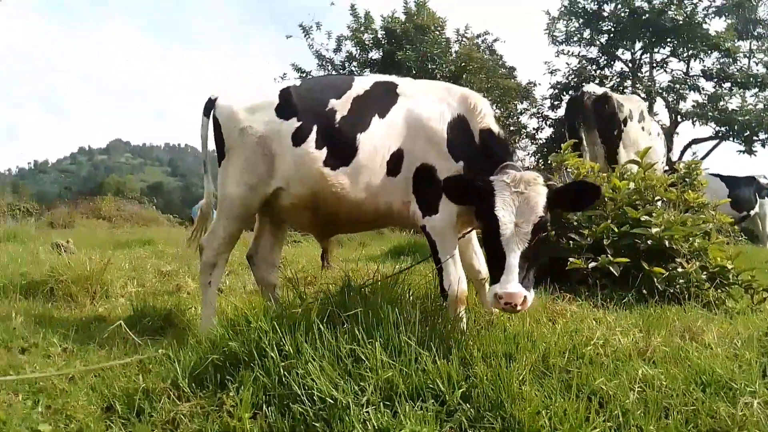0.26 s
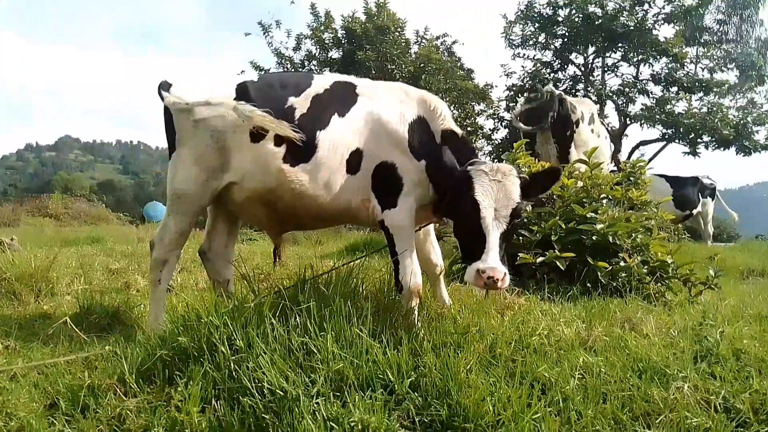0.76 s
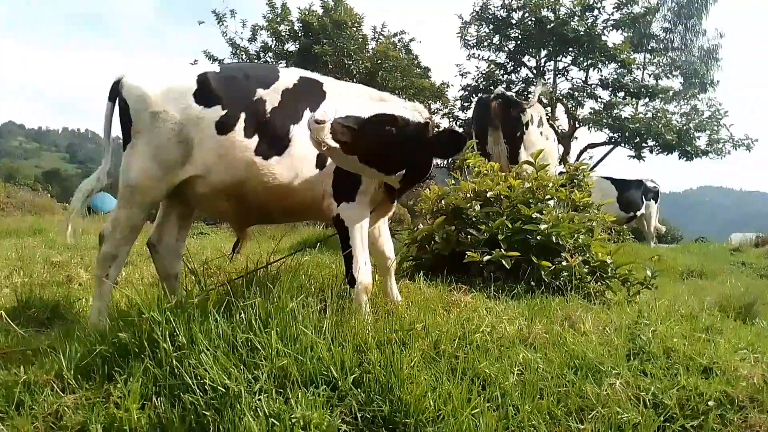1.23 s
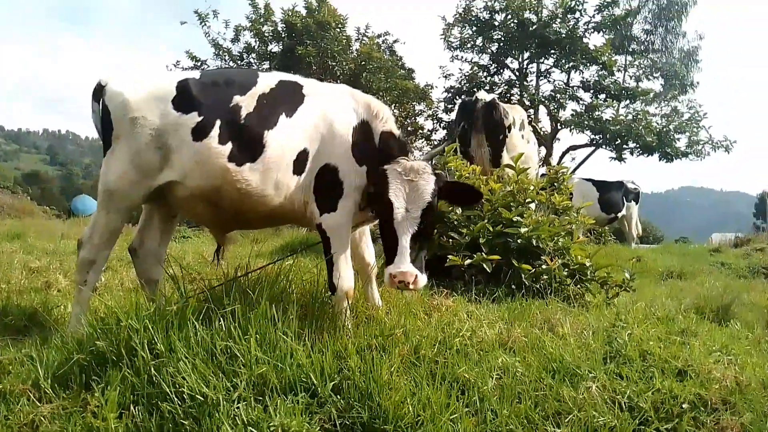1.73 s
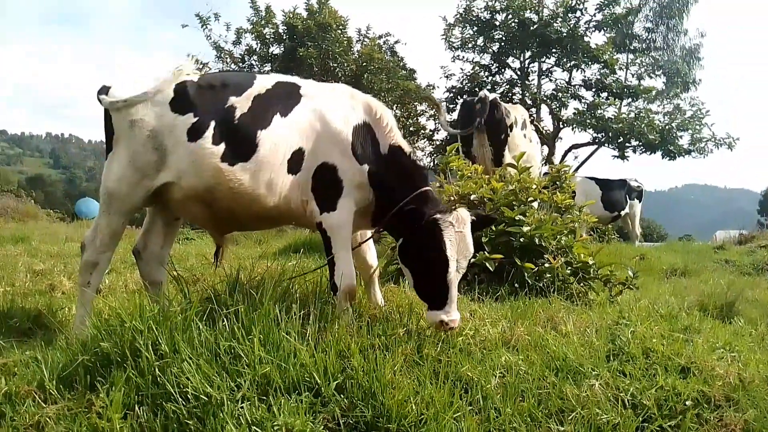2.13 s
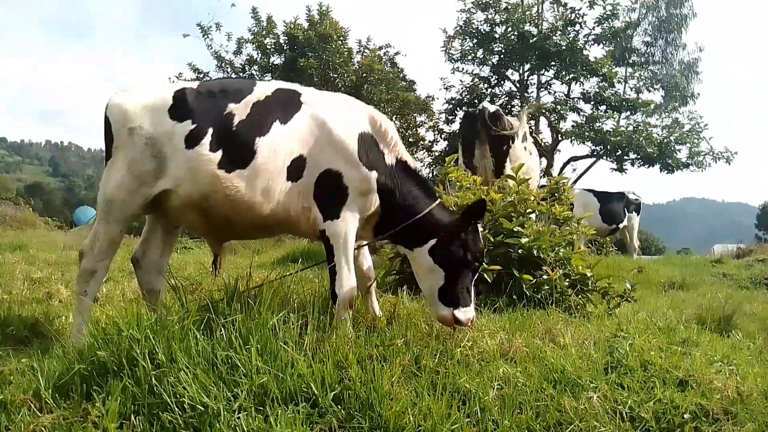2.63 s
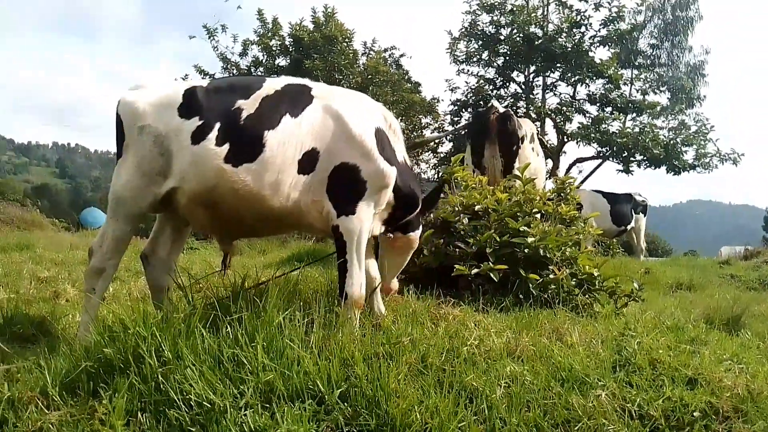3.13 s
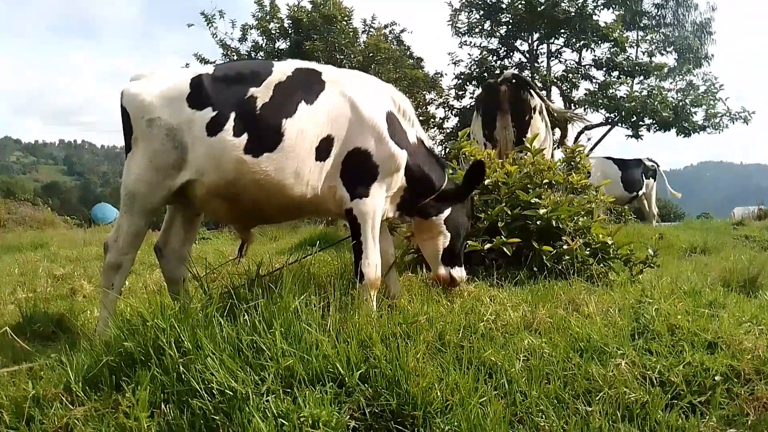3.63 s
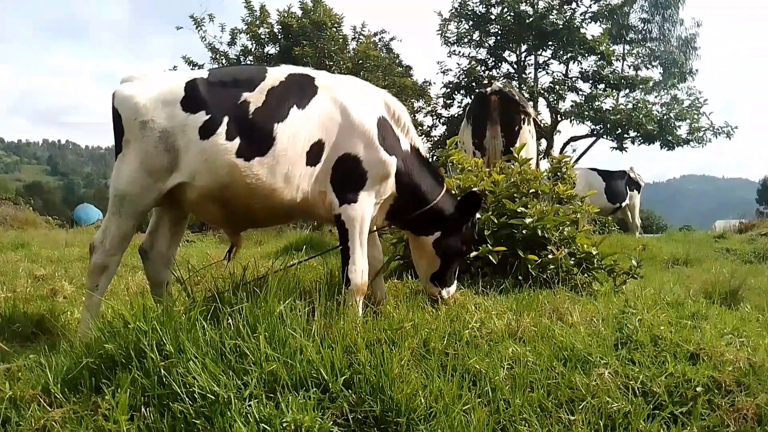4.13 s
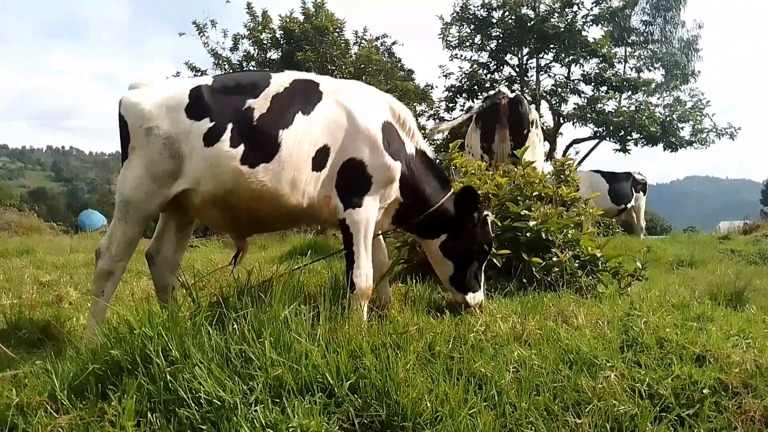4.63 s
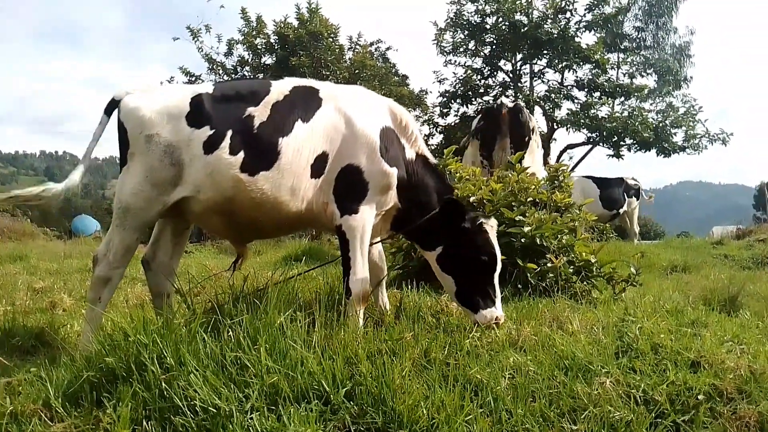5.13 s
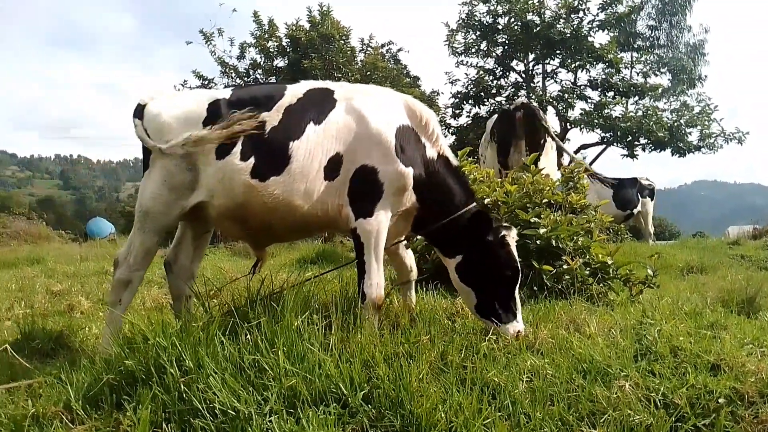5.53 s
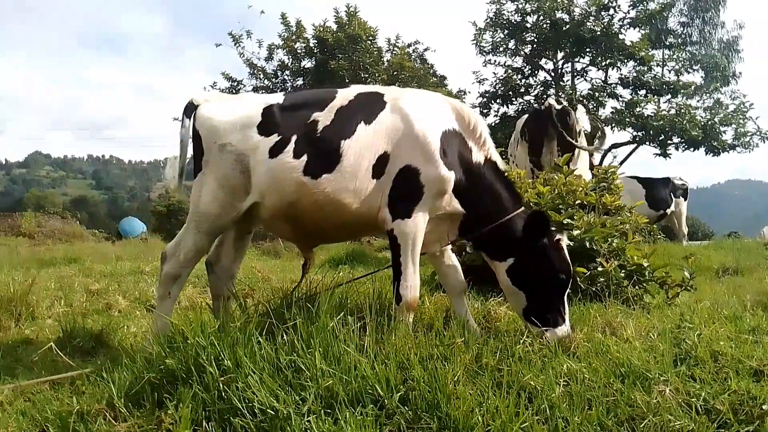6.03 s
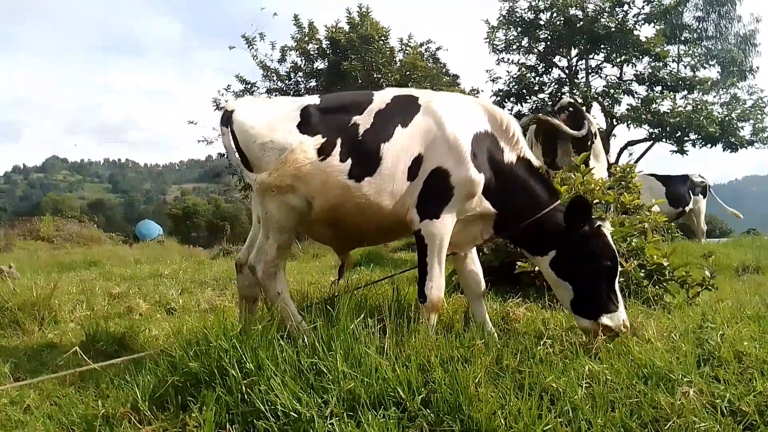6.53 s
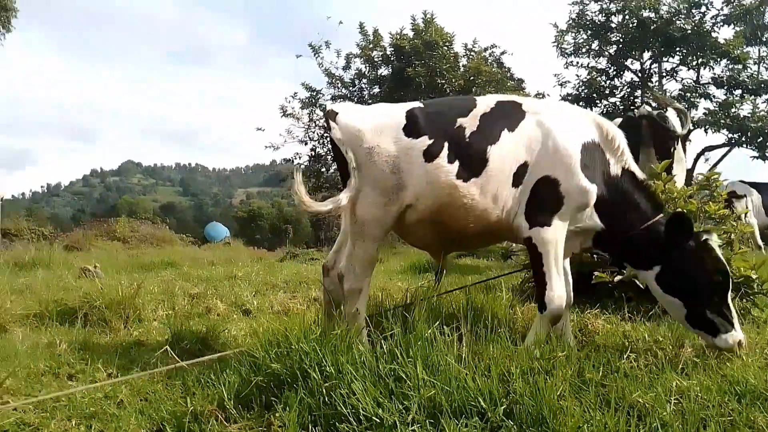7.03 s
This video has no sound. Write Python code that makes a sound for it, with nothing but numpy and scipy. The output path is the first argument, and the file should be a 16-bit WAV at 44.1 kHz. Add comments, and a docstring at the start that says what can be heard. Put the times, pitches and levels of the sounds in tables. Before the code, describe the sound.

Crisp grass rustling and stem snaps from a grazing cow, dull contact thuds, pulsing high cricket chirps, tiny bird notes and a faint breeze.

```python
"""Cow in long grass on a hillside pasture

A cow noses about close to the microphone: noise grains and fluttering bands rustle as blades, dying noise
bursts snap as stems, hooves and ears thud as short low rings, and jaw and tongue pop wetly. Crickets trill
near 6 kHz as falling tones, insects drone near 10 kHz as a noise band, small birds whistle gliding notes,
stalks tick, a breeze hisses. Hedge, slope and valley answer. One microphone feeds both channels."""
import sys
import numpy as np
from scipy import signal
from scipy.fft import rfft, irfft
from scipy.io import wavfile

SR = 44100
rng = np.random.default_rng(int(sys.argv[2]) if len(sys.argv) > 2 else 0)


def generate_wav(sig):
    """Save sig (samples, or channels by samples) to the path in sys.argv[1] as 16-bit PCM at SR."""
    pcm = np.round(np.clip(np.atleast_2d(sig).T, -1, 1) * 32767).astype(np.int16)
    wavfile.write(sys.argv[1], SR, pcm)


def to_linear_factor(level_db):
    """Convert decibel levels (scalar or array-like) to linear amplitude factors."""
    exponent = np.asarray(level_db, float) / 20
    return 10 ** exponent


N = 320166
TIME = np.arange(N) / SR


def in_time(rows):
    """Table columns joined by straight lines, one value a sample."""
    s, *columns = np.transpose(rows)
    return [np.interp(TIME, s, c) for c in columns]


def rms_one(x):
    """Scale to unit power."""
    return x / np.sqrt(np.mean(x ** 2) + 1e-20)


def colour(x, spectrum):
    """Minimum-phase filter through the (Hz, dB) points: nothing sounds early."""
    hz, db = np.transpose(spectrum)
    grid = np.maximum(np.arange(2049) * SR / 4096, 1)
    log_gain = np.log(to_linear_factor(np.interp(np.log(grid), np.log(hz), db)))
    cepstrum = irfft(log_gain)
    # folding the cepstrum onto positive time gives minimum phase
    cepstrum[1:2048] *= 2
    cepstrum[2049:] = 0
    response = irfft(np.exp(rfft(cepstrum)))
    return signal.fftconvolve(x, response)[:N]


def band(x, low_hz, high_hz):
    """Butterworth band-pass."""
    return signal.sosfilt(signal.butter(2, [low_hz, high_hz], "band", fs=SR, output="sos"), x)


def drift(rate):
    """Slow chance of about unit spread, with `rate` random knots per second."""
    knots = rng.standard_normal(2000)
    return np.interp(TIME * rate, np.arange(2000), knots) * 1.2


def add(out, s, burst):
    """Mix a short sound in at time s."""
    i = round(s * SR)
    out[i:i + len(burst)] += burst[:N - i]


def breeze():
    """Leaves and far wind: noise in which every band swells and sinks a little on its own."""
    # level of the breeze: (time [s], level [dB])
    breeze_level = [(0, -60), (.2, -56.5), (.5, -61), (1.15, -60.5), (1.5, -59.5), (2.1, -62.5),
                    (2.8, -62.5), (3.2, -60), (3.6, -62), (4.2, -60), (4.55, -62.5), (4.75, -60.5),
                    (5.3, -62), (5.52, -61), (5.8, -64.5), (6.3, -59.5), (6.7, -64), (7.0, -61),
                    (7.26, -66)]
    # spectrum of moving air and leaves: (frequency [Hz], relative level [dB per Hz])
    air_spectrum = [(25, 8), (60, -1.5), (200, -0.5), (400, -0.1), (900, -5.5), (2100, -9), (3300, -12.5),
                    (4900, -15.5), (7000, -1), (9000, -7), (12000, -22.5), (16000, -11.5)]
    edges = 20 * 2 ** np.arange(0, 10.1, .7)
    patches = sum(to_linear_factor(2.64 * drift(7.0)) * band(rng.standard_normal(N), low, high)
                  for low, high in zip(edges, edges[1:]))
    return to_linear_factor(*in_time(breeze_level)) * rms_one(colour(patches, air_spectrum))


def drone(db, hz, share):
    """A chorus of tiny wings: noise in a wandering band, part of it throbbing."""
    width_hz, throbs_per_s = 960, 97
    lowpass = signal.butter(2, width_hz / 2, fs=SR, output="sos")
    low = signal.sosfilt(lowpass, rng.standard_normal((2, N)))
    # two slow noises on a carrier make one band around the wandering centre
    turn = 2 * np.pi * np.cumsum(hz) / SR
    hiss = rms_one(low[0] * np.cos(turn) + low[1] * np.sin(turn))
    throb = np.cos(2 * np.pi * np.cumsum(throbs_per_s + 1.31 * drift(1.75)) / SR)
    return to_linear_factor(db) * hiss * (1 + np.clip(share, 0, 1) * throb)


def rustle(db, dark):
    """Blades rub: dense uneven grains, clumped in time; damp low blades sound darker."""
    # spectrum of rubbing blades: (frequency [Hz], relative level [dB per Hz])
    blade_spectrum = [(300, -13.5), (1500, -12), (3400, -12), (5000, -6.5), (6500, -4), (8500, 3.5),
                      (11000, -4), (15000, -5), (16000, -2.5)]
    grains_per_s = 5000 * to_linear_factor(3 * drift(40.0))
    born = rng.random(N) < grains_per_s / SR
    size = to_linear_factor(3.4 * np.minimum(rng.exponential(1, N), 5))
    grains = born * size * rng.choice([-1, 1], N)
    bright = rms_one(colour(rms_one(grains) + 0.61 * rng.standard_normal(N), blade_spectrum))
    # darkness adds weight at 5.4-10 kHz, below the brightest hiss
    darker = 2.15 * np.clip(dark, 0, 1) * band(bright, 5440, 10100)
    return to_linear_factor(db + 1.26 * drift(30.0)) * (bright + darker)


def high_rustle(db):
    """Thin rustle hiss of the grass: noise in a narrow band near 10.9 kHz."""
    return to_linear_factor(db) * rms_one(band(band(rng.standard_normal(N), 10750, 11050), 10750, 11050))


def whistle(length, from_hz, to_hz, flutter):
    """A note that glides fast at first, then levels out; its loudness flutters."""
    part = np.arange(0, 1, 1 / (length * SR))
    pitch = to_hz + (from_hz - to_hz) * (1 - part) ** 3
    loudness = np.sin(np.pi * part) ** .5 * flutter[:len(part)]
    return loudness * np.sin(2 * np.pi * np.cumsum(pitch) / SR)


def mid_rustle():
    """Grass noise at 2.7-3.9 kHz, with short whistling squeaks that flutter and come at random."""
    # level of the middle band of the rustle: (time [s], level [dB])
    mid_level = [(0, -58.5), (.2, -58.5), (.3, -67), (.9, -69.5), (1.3, -65.5), (1.9, -79), (2.3, -71),
                 (2.7, -74), (3.05, -67), (3.4, -76.5), (4.2, -68), (5.3, -74), (5.8, -64.5), (6.15, -71),
                 (6.4, -66.5), (6.8, -63.5), (7.26, -70)]
    flutter = to_linear_factor(3 * drift(250.0))
    mid = rms_one(band(rng.standard_normal(N), 2730, 3880))
    for when, long, low, glide in rng.random((90, 4)):
        hz = 2600 + 1000 * low
        squeak = whistle(.015 + .04 * long, hz * (.88 + .24 * glide), hz, flutter)
        add(mid, 7.2 * when, .7 * squeak)
    return to_linear_factor(*in_time(mid_level)) * rms_one(mid)


def snaps(rustle_db):
    """A stem breaks: a noise burst as crack, a short ring, a duller body; small ones follow the rustle."""
    # stems that snap: (time [s], nominal level [dB], body against crack before colouring [dB])
    stem_snaps = [(0.0646, -37.5, -1), (0.1625, -25.5, -16), (0.2594, -43, 8.5), (.288, -35, -13),
                  (.4213, -44, -11), (1.0027, -41, 2), (1.064, -37, -6.5), (1.586, -49.5, 12.5),
                  (2.965, -43, -3), (2.369, -37, -14), (3.463, -32, -20), (4.1449, -37, -13),
                  (4.352, -40.5, -6), (4.4791, -44.5, 2.5), (4.5823, -40, -12), (4.6392, -30, -18),
                  (4.667, -27, -8.5), (4.6894, -29.5, -18), (4.6933, -32, -23), (4.7757, -38, -19),
                  (5.4992, -39, -10), (5.8142, -32, -26), (5.8328, -21.5, -12.5), (5.849, -32.5, -10),
                  (5.8757, -31.5, -19), (6.0857, -28, -15), (6.3666, -27, -6.5), (6.371, -38, -11),
                  (6.3785, -27, -19), (6.3886, -28, -15), (6.4, -32, -12), (6.4064, -27.5, -14),
                  (6.4226, -29.5, -10), (6.4511, -29, -2.5), (6.8253, -34.5, -21), (6.839, -42.5, -21),
                  (7.0302, -30, -19), (7.0361, -34, -10), (7.0402, -23, -15), (7.0418, -19, -17),
                  (7.069, -27.5, -14), (7.0724, -31, -8.5), (7.0736, -33, -14), (7.0769, -34, -6)]
    # spectrum of the crack: (frequency [Hz], gain before a common lift [dB])
    crack_spectrum = [(300, -22), (2100, -42), (5000, -26), (6700, -6.5), (8400, -0.5), (10000, -10.5),
                      (12300, -17), (15000, -20), (16000, -10)]
    # spectrum of the stem's body: (frequency [Hz], gain [dB])
    stem_spectrum = [(300, -46), (800, -5), (2100, -3), (3400, 8), (4500, -1.5), (6000, -42)]
    small_per_s, small_db, busy_db = 20, -46.5, -56.5     # this many a second at the busy rustle level
    usual_t60_s, ring_hz, ring_spread_hz = 0.02, 8620, 970
    crack, body, ring = np.zeros((3, N))
    t = np.arange(1300) / SR
    when, keep, size, dull = rng.random((400, 4)).T
    when = when * N / SR
    wanted = small_per_s * to_linear_factor(np.interp(when, TIME, rustle_db) - busy_db) * N / SR
    kept = keep < wanted / len(when)
    small = np.transpose([when, small_db - 10.2 * size, 20.0 * dull - 17.0])[kept]
    noises = rng.standard_normal((len(stem_snaps) + len(when), 2, len(t) + 1))
    for (s, db, body_db), noise in zip([*stem_snaps, *small], noises):
        # the last value of each noise row is spare: it varies decay and ring
        t60 = usual_t60_s * to_linear_factor(0.5 * noise[0, -1])
        hz = ring_hz + ring_spread_hz * noise[1, -1]
        onset = (1 - np.exp(-t / 0.00017)) * (0.54 + 1.18 * np.exp(-t / 0.00033))
        fall = to_linear_factor(db - 60 * t / t60) * onset
        burst = fall * noise[:, :-1]
        # every burst carries the energy of its envelope
        burst = burst * np.linalg.norm(fall) / np.linalg.norm(burst, axis=1, keepdims=True)
        add(crack, s, burst[0])
        add(body, s, to_linear_factor(body_db) * burst[1])
        add(ring, s, 0.13 * fall * np.sin(2 * np.pi * hz * t))
    return ring + to_linear_factor(8.5) * colour(crack, crack_spectrum) + colour(body, stem_spectrum)


def thuds():
    """Soft contacts of hooves and ears: a ring of a few cycles, a grainy puff and a hard first touch."""
    # soft thuds and knocks: (time [s], nominal level [dB], pitch [Hz], time to fade 60 dB [cycles])
    soft_contacts = [(.066, -44.5, 345, 10), (.136, -43.5, 1000, 24), (.162, -44, 440, 14),
                     (.335, -48.5, 431, 18), (.649, -49.5, 1270, 27), (.753, -42.5, 1270, 37),
                     (1.002, -38, 239, 5), (1.565, -39.5, 237, 4.5), (1.584, -43, 220, 11),
                     (1.613, -26, 348, 3.5), (1.615, -42, 140, 6.5), (1.681, -29.5, 330, 3.5),
                     (1.684, -44, 140, 6), (2.315, -43, 315, 9), (3.09, -47.5, 406, 8),
                     (3.169, -45.5, 300, 12), (3.184, -40.5, 600, 8), (3.759, -48, 368, 6.5),
                     (3.812, -46, 1740, 50.5), (4.014, -44.5, 262, 6.5), (4.103, -45, 930, 9),
                     (4.144, -45, 860, 12), (4.465, -46, 1670, 29), (4.479, -45, 1500, 20),
                     (4.677, -44, 322, 6), (4.713, -42, 530, 4), (4.73, -48, 298, 21), (4.742, -47, 377, 9),
                     (5.055, -50, 1880, 59), (5.079, -50, 1200, 25), (5.474, -54, 299, 14),
                     (5.493, -45.5, 457, 11), (5.51, -50, 300, 15.5), (6.45, -39, 251, 7.5),
                     (7.041, -38, 600, 15), (7.074, -34, 646, 12), (7.076, -36.5, 1050, 16),
                     (7.085, -47, 150, 6.5)]
    grain, faint_db, faint_cycles = 0.42, -52.5, 11     # grain: share of puff, 0-1
    out, t = np.zeros(N), np.arange(4000) / SR
    faint = [(when * N / SR, faint_db - 4.4 * size, 250 + 250 * pitch, faint_cycles)
             for when, size, pitch in rng.random((14, 3))]
    grainy = np.clip(grain, .02, 1)
    for s, db, hz, cycles in soft_contacts + faint:
        noise = rng.standard_normal(len(t))
        puff = rms_one(band(noise ** 3, hz * .5, hz * 2.68))     # cubed noise crunches in grains
        touch = rms_one(band(noise, hz * 2.0, hz * 9.1)) * np.exp(-t * hz * 1.4)
        swell = 1 - np.exp(-t * hz / (0.74 * grainy))
        tone = (1 - grainy) * np.sin(2 * np.pi * hz * t)
        contact = 0.15 * (1 - grainy) * touch + swell * (tone + grainy * puff)
        add(out, s, to_linear_factor(db - 60 * t * hz / cycles) * contact)
    return out


def chewing():
    """Small wet pops of jaw and tongue, in clumps, each ringing a few cycles."""
    out, t = np.zeros(N), np.arange(1500) / SR
    clumps = 7 * rng.random(60)     # clump starts in s
    for clump, when, pitch, size in rng.random((300, 4)):
        hz = 250 * 14.0 ** pitch
        fall = to_linear_factor(-9.0 * size - 12.5 * t * hz) * (1 - np.exp(-t * hz))
        s = clumps[int(clump * len(clumps))] + .12 * when
        add(out, s, fall * np.sin(2 * np.pi * hz * t))
    return to_linear_factor(-51.5) * out


def bird_notes():
    """Separate bird notes and faint far tones: each one a gliding, fluttering whistle."""
    # a near bird's upward chirps: (time [s], length [s], start pitch [Hz], level before flutter [dB])
    chirp_rows = [(0.243, 0.025, 4320, -44.5), (0.261, .009, 4240, -40), (0.286, 0.0039, 5950, -44),
                  (.295, 0.012, 5750, -43), (.309, .0074, 5060, -43.5), (0.319, .0065, 4960, -51),
                  (1.866, 0.011, 5500, -38.5), (4.673, 0.019, 5010, -40), (4.686, 0.017, 5050, -39)]
    # another bird's repeated falling note: (time [s], length [s], level before flutter [dB])
    tseep_rows = [(6.04, .04, -58), (6.295, 0.061, -57), (6.57, .07, -58.5), (6.866, .051, -56.5),
                  (7.148, .046, -58)]
    # other bird notes: (time [s], length [s], start pitch [Hz], end pitch [Hz], level before flutter [dB])
    other_notes = [(.235, 0.015, 5200, 7000, -45), (0.267, 0.02, 6180, 6120, -44),
                   (1.874, 0.039, 6740, 6840, -48), (1.885, 0.043, 7170, 7130, -48),
                   (1.92, .045, 6950, 6900, -48.5), (1.962, .03, 6900, 6980, -53),
                   (2.109, 0.037, 2690, 2800, -66), (2.234, 0.047, 3490, 2980, -62),
                   (2.469, 0.028, 3000, 2720, -63), (2.882, .022, 3300, 3400, -63),
                   (2.904, .02, 3200, 2960, -64), (3.002, .02, 2510, 2490, -67),
                   (2.703, .012, 6800, 6300, -59), (2.836, 0.013, 7050, 6400, -61),
                   (3.384, 0.012, 6740, 6300, -53.5), (4.614, 0.057, 3450, 3200, -58),
                   (3.992, 0.032, 3500, 3250, -63), (5.64, .1, 3100, 2660, -66.5),
                   (4.659, 0.0091, 6500, 6900, -41), (4.732, 0.0083, 6300, 6570, -43),
                   (5.118, 0.022, 3020, 3480, -55.5), (5.14, .025, 3400, 3010, -61.5),
                   (5.073, .014, 3200, 3270, -60.5), (5.661, .0096, 8300, 8130, -38),
                   (5.671, .013, 8150, 7750, -41), (5.677, 0.029, 7500, 7350, -45),
                   (5.679, .013, 6150, 6170, -40), (5.68, 0.028, 3360, 3240, -57),
                   (5.9, .02, 5690, 5630, -48), (6.226, 0.032, 3600, 3270, -58.5),
                   (7.107, 0.054, 3280, 3230, -59.5)]
    # faint low tones from far away:
    # (time [s], length [s], start pitch [Hz], end pitch [Hz], level before flutter [dB])
    far_tones = [(4.175, .11, 766, 752, -68), (5.76, .25, 1080, 907, -76), (7.114, .14, 1082, 1060, -72.5)]
    chirp_top_hz, tseep_from_hz, tseep_to_hz = 6400, 5700, 5300
    out, flutter = np.zeros(N), to_linear_factor(3 * drift(250.0))
    chirps = [(s, length, hz, chirp_top_hz, db) for s, length, hz, db in chirp_rows]
    tseeps = [(s, length, tseep_from_hz, tseep_to_hz, db) for s, length, db in tseep_rows]
    for s, length, from_hz, to_hz, db in chirps + tseeps + other_notes + far_tones:
        add(out, s, to_linear_factor(db) * whistle(length, from_hz, to_hz, flutter[round(s * SR):]))
    return out


def ticks():
    """A dry stalk gives one click, a band-passed impulse too short to ring."""
    # dry single ticks: (time [s], peak level [dB], low edge [Hz], high edge [Hz])
    stalk_ticks = [(0.422, -33, 1200, 5200), (3.4655, -31.5, 3060, 9000)]
    out = np.zeros(N)
    for s, db, low_hz, high_hz in stalk_ticks:
        click = band(signal.unit_impulse(200), low_hz, high_hz)
        add(out, s, to_linear_factor(db) * click / np.abs(click).max())
    return out


def crickets():
    """Every wing stroke is a short tone falling in pitch; pace drifts and strokes turn long-short in a trill."""
    # trills: (voice, first stroke [s], last stroke [s], pace in the middle [strokes per s])
    trills = [("wide", .4311, .5001, 144.1), ("wide", .7062, .8286, 147), ("wide", 1.0245, 1.1707, 143.5),
              ("wide", 1.3734, 1.5293, 140.4), ("wide", 1.7582, 1.9316, 138.4),
              ("wide", 1.9905, 2.1204, 123.2), ("faint", 2.6898, 2.8281, 115.8),
              ("narrow", 2.8454, 2.9316, 139.5), ("narrow", 3.1651, 3.2924, 141.7),
              ("faint", 3.3012, 3.3691, 117.6), ("narrow", 3.4992, 3.6263, 142),
              ("narrow", 3.8228, 3.9522, 140), ("faint", 3.9737, 4.0668, 108),
              ("narrow", 4.1669, 4.3065, 136.5), ("faint", 4.3285, 4.4643, 121),
              ("narrow", 4.5214, 4.654, 135.6), ("narrow", 4.8918, 5.0185, 134.1),
              ("high", 5.0313, 5.0863, 144.1), ("high", 5.3006, 5.4348, 149),
              ("high", 5.6536, 5.7902, 146.1), ("high", 6.0067, 6.1445, 145)]
    # level of each trill before stroke spread, same order: (start [dB], end [dB])
    trill_levels = [(-53, -44.5), (-52, -43.5), (-50, -42), (-47.5, -40), (-50, -39), (-62, -55),
                    (-67, -56.5), (-55, -44), (-52, -42), (-67.5, -55), (-52, -40.5), (-51.5, -42),
                    (-51, -60), (-50, -39), (-51, -59), (-49, -40), (-50.5, -39), (-44.5, -48.5),
                    (-54.5, -47.5), (-53, -47), (-53, -48.5)]
    # by voice: (held pitch [Hz], first strokes off that [Hz], half the fall within a stroke [Hz],
    #            slowing through a trill [share, negative quickens], early share of the swell [ratio])
    voices = {"wide": (5920, 140, 1180, 0.08, 1), "narrow": (6039.5, -200, 490, 0.2, 0.72),
              "high": (6351, -96.5, 478, -0.1, 1.13), "faint": (5600, 99, 660, 0.21, 0.61)}
    narrowness, spread_db, long_short = 5.8, 1.7, 0.25
    out = np.zeros(N)
    for (voice, first, last, pace), (start_db, end_db) in zip(trills, trill_levels):
        held_hz, off_hz, sweep_hz, slowing, early = voices[voice]
        rate, end_rate = pace * (1 + slowing / 2), pace * (1 - slowing / 2)
        t = np.arange(first - 3.4 / rate, last + .5 / end_rate, 1 / SR)
        part = (t - first) / (last - first)
        strokes = 4.5 + (t - first) * (rate + (end_rate - rate) * part / 2)
        count = strokes.astype(int)
        strength, start, late = rng.standard_normal((3, 40))[:, count]     # chance of each stroke
        within = np.clip((strokes % 1 - .5 - 0.0302 * late) * 1.2, -.5, .5)
        # every other stroke grows shorter towards the end
        short = (count[-100] - count) % 2 * part * long_short * sweep_hz / 1000
        power = narrowness * (1 + 1.8 * np.clip(short, 0, 1))
        shape = np.tanh(3.45 * np.cos(np.pi * within) ** power)
        fall = (within + .5) ** 1.8 - .3     # the pitch holds, then drops as the wing slows
        pitch = np.interp(part, [0, .5], [held_hz + off_hz, held_hz]) + 60 * late
        pitch = pitch - 2 * sweep_hz * fall * np.interp(part, [0, .5], [.6, 1])
        early_db = start_db + early * (end_db - start_db)
        db = np.interp(part, [-0.061, -0.041, 0.38, 1], [start_db - 30.0, start_db, early_db, end_db])
        tone = np.sin(2 * np.pi * np.cumsum(pitch) / SR + 1.2 * start)
        add(out, t[0], to_linear_factor(db + spread_db * strength) * shape * tone)
    # the wing radiates little below its resonance
    return signal.sosfilt(signal.butter(8, 5000, "high", fs=SR, output="sos"), out)


def surroundings(near):
    """Hedge and slope send back near echoes; the valley adds a diffuse tail of dying noise."""
    # hedge and slope: (delay [s], level against the direct sound [dB])
    reflections = [(.0045, -17), (0.01, -16), (.019, -19.5), (0.031, -26)]
    valley_db, valley_t60_s = -15.5, 1
    t = np.arange(SR) / SR
    scatter = rng.standard_normal(SR) * to_linear_factor(-60 * t / valley_t60_s) * (t > .03)
    back = to_linear_factor(valley_db) * signal.fftconvolve(near, scatter / np.linalg.norm(scatter))[:N]
    for delay, db in reflections:
        add(back, delay, to_linear_factor(db) * near)
    return back


def scene():
    """All sources at one microphone; bird notes, crickets, snaps and ticks get the echoes."""
    # the cow stirs the grass: (time [s], rustle level before darkening and drift [dB], darkness [0-1])
    grass_stir = [(0, -48.5, .15), (.17, -49.5, 0), (.24, -55, 0.44), (.5, -58.5, 0.04), (.56, -64.5, 0.3),
                  (.95, -63, 0.5), (1.07, -58, 0.55), (1.16, -63, 0.34), (1.62, -62, 0.46),
                  (1.73, -54, 0.1), (1.78, -62.5, 0.26), (2.4, -63, 0.4), (2.49, -59, 0.32),
                  (3.05, -63, 0.4), (3.17, -56, .2), (3.42, -70, .5), (3.48, -56, 0.04), (4.0, -60, 0.42),
                  (4.55, -62, .5), (4.69, -46.5, 0.05), (4.79, -59, 0.6), (5.05, -63.5, 0.3),
                  (5.44, -60, 0.64), (5.5, -52.5, 0.2), (5.7, -61.5, 0.7), (5.84, -54, 0.86),
                  (5.9, -54, 0.67), (6.07, -55, 0.73), (6.12, -60.5, 0.53), (6.33, -56, 0.53),
                  (6.39, -52.5, 0.6), (6.49, -58, 0.56), (6.61, -48.5, 0.04), (6.83, -51, 0.4),
                  (6.88, -58.5, 0.42), (7.02, -59, 0.6), (7.08, -52, .2), (7.11, -59, 0.5),
                  (7.26, -52.5, 0.3)]
    # high bands: (time [s], insect drone level before throbbing [dB], drone centre [Hz],
    #              share of drone that throbs [0-1], level of a thin band of rustle hiss near 10.9 kHz [dB])
    high_bands = [(0, -63, 9800, 0.1, -70.5), (.56, -57.5, 9610, 0.4, -82), (1.0, -58, 9700, 0.2, -78.5),
                  (1.66, -60, 9730, 0, -71), (2.5, -60, 9940, .2, -96), (3.3, -61, 9770, 0, -76),
                  (4.5, -58.5, 9700, 0.17, -78), (5.6, -61, 9800, 0.4, -81), (5.9, -55.5, 9770, 0.2, -66),
                  (6.25, -58.5, 9830, .2, -72), (6.7, -53.5, 9740, .25, -63), (7.26, -60, 9880, 0.1, -78.5)]
    rustle_db, dark = in_time(grass_stir)
    drone_db, drone_hz, throb_share, hiss_db = in_time(high_bands)
    near = snaps(rustle_db) + bird_notes() + ticks() + crickets()
    grass = rustle(rustle_db, dark) + high_rustle(hiss_db) + mid_rustle()
    cow = thuds() + chewing()
    mono = near + surroundings(near) + grass + cow + drone(drone_db, drone_hz, throb_share) + breeze()
    return np.array([mono, mono])


def band_limit(x):
    """A steep low-pass at the top of the band."""
    return signal.sosfilt(signal.butter(12, 16440, fs=SR, output="sos"), x)


def record(dry):
    """The small capsule loses the bass below 120 Hz; the top is cut, 50 dB down from 15.9 kHz."""
    thin = signal.sosfilt(signal.butter(2, 120, "high", fs=SR, output="sos"), dry)
    cut = signal.sosfilt(signal.cheby2(16, 50, 15900, fs=SR, output="sos"), thin)
    return band_limit(cut)


dry = scene()
out = record(dry)
generate_wav(out)
```